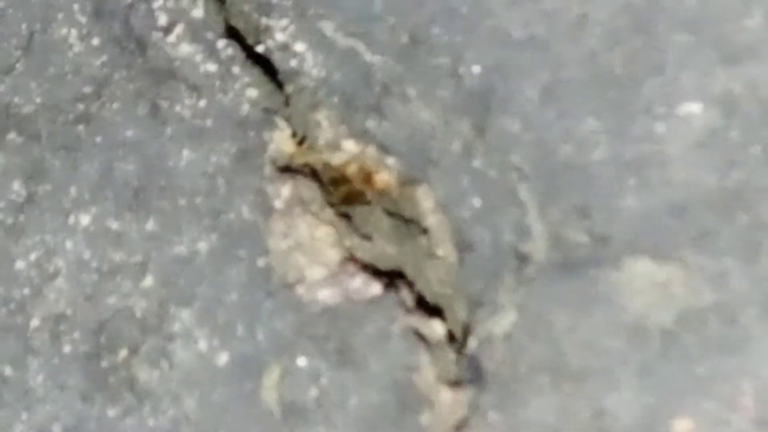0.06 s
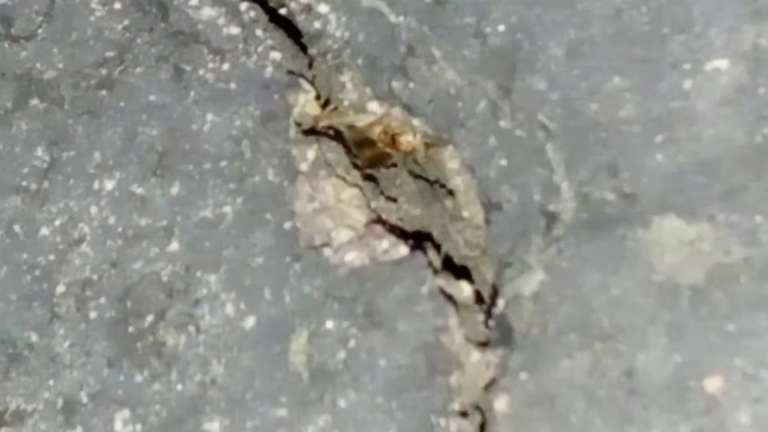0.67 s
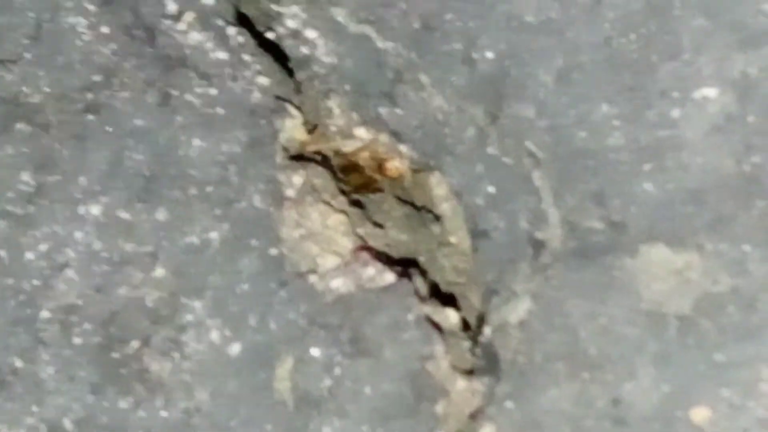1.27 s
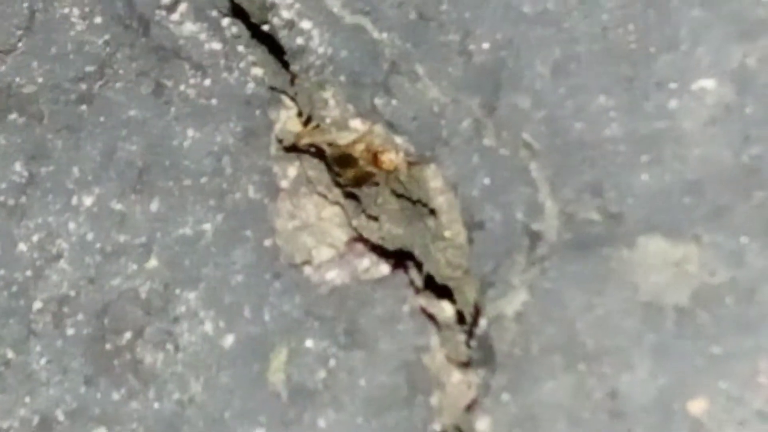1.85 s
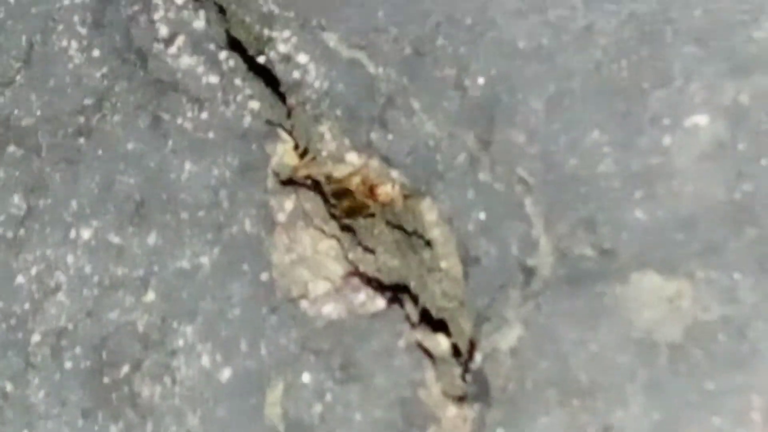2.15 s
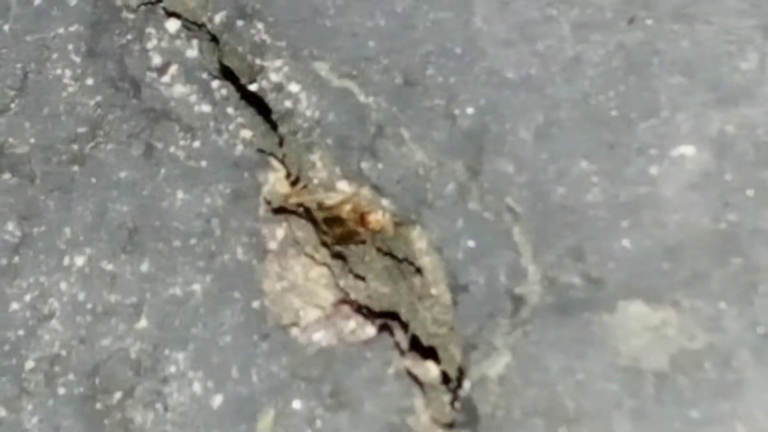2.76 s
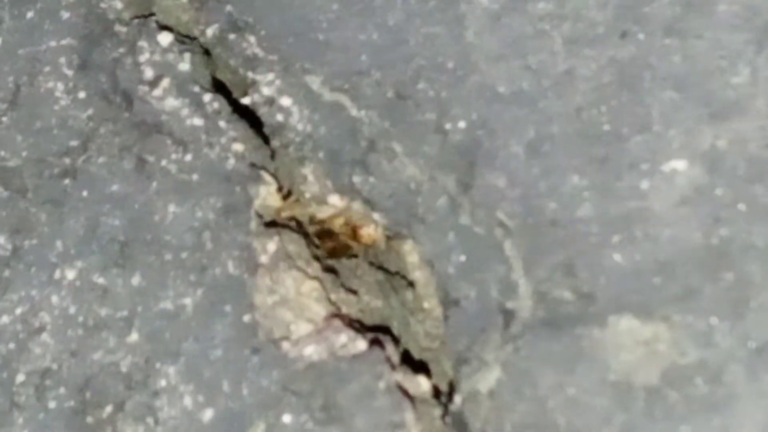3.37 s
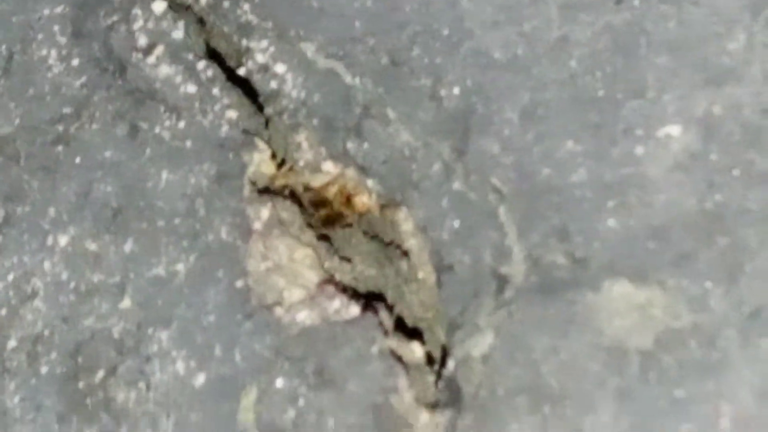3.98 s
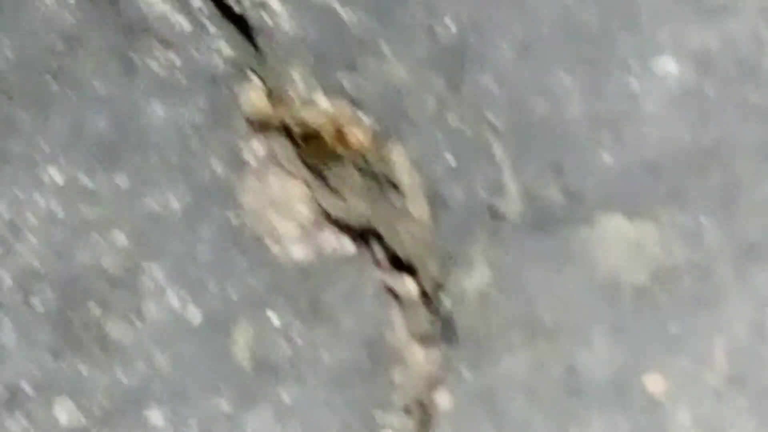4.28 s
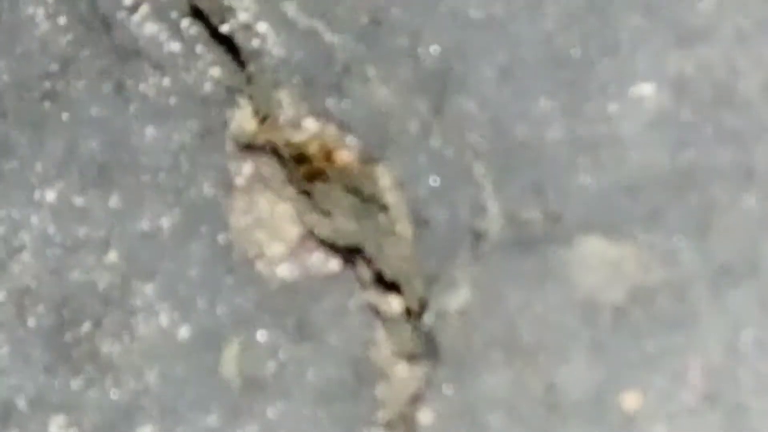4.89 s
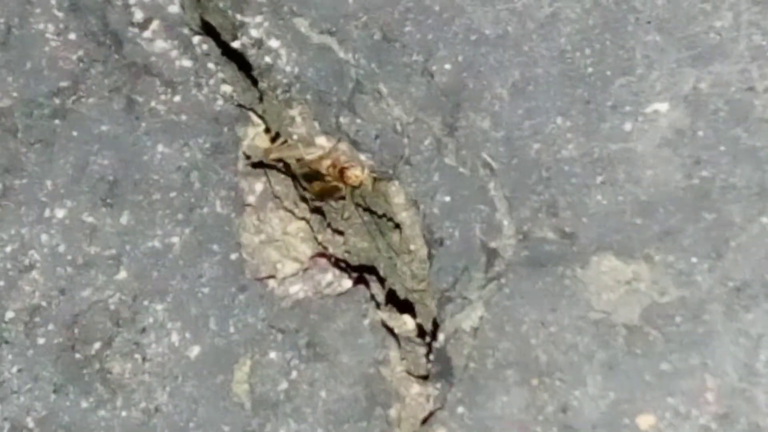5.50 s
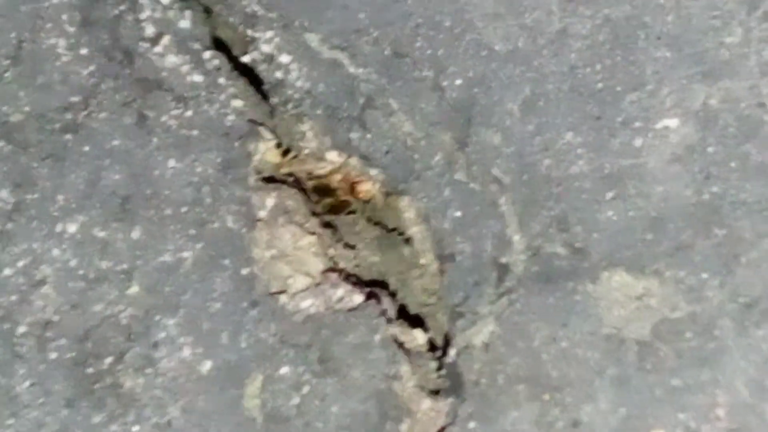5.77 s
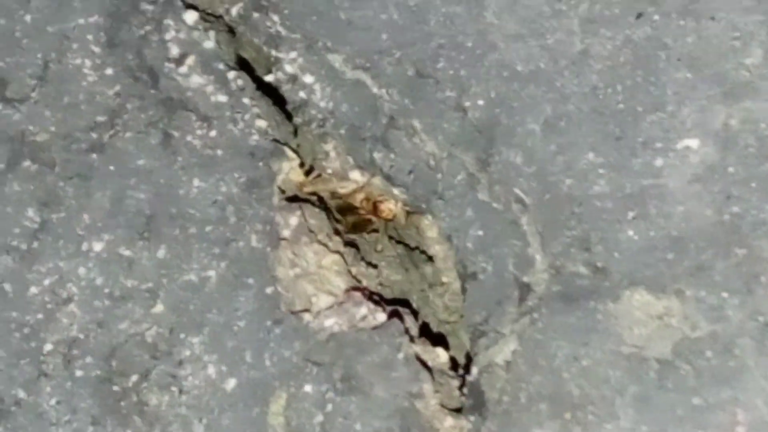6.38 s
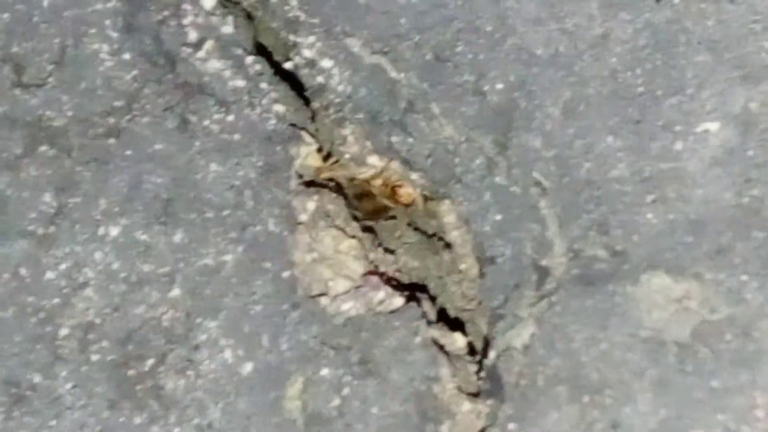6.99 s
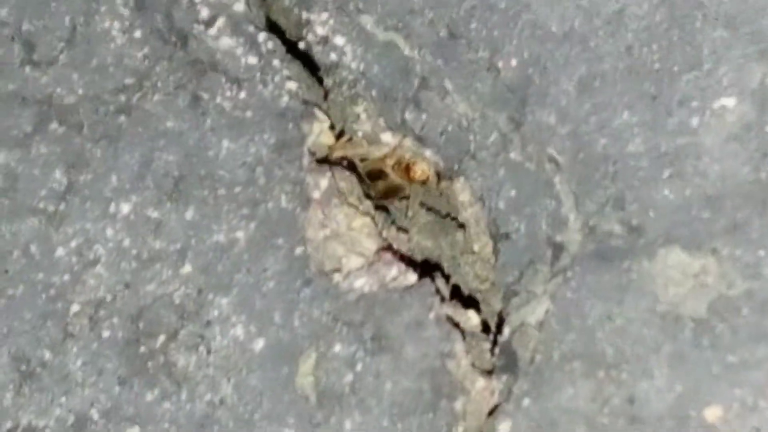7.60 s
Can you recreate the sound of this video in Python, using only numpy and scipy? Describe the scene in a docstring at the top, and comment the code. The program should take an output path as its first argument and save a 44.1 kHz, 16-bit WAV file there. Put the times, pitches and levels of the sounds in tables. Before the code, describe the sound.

Fast, regular, high-pitched cricket chirping close by, with faint traffic rumble and a few tiny bird calls behind it.

```python
"""A cricket is already singing from a crack in sunlit concrete, close to the microphone: eight chirps a
second, three strokes each, its scraper running along the file and ringing the wings near 7 kHz. Gain
control ducks under each chirp; a distant engine drones over outdoor rumble. Half a second in come the
first of a few sharp snaps, small bird calls and soft rustles. At 1.5 s one chirp is hurried. From about
3 s far-off noise swells more strongly, and toward the end the traffic grows a little louder."""
import sys
import numpy as np
from scipy import signal
from scipy.fft import rfft, irfft
from scipy.io import wavfile
from scipy.ndimage import uniform_filter1d

SR = 44100
rng = np.random.default_rng(int(sys.argv[2]) if len(sys.argv) > 2 else 0)


def transcribe(signal):
    """Save signal, clipped to [-1, 1], as a 16-bit WAV file at the path in sys.argv[1]."""
    frames = np.atleast_2d(signal).T
    limited = np.clip(frames, -1, 1)
    pcm = np.round(limited * 32767).astype(np.int16)
    wavfile.write(sys.argv[1], SR, pcm)


N = 337365

# The cricket's chirps, close to the microphone. Each entry: centre of the last stroke in seconds.
CHIRP_TIMES = [0.0552, 0.1801, 0.3025, 0.4268, 0.5486, 0.6719, 0.7944, 0.9184, 1.0397, 1.1559, 1.2774,
               1.4012, 1.5053, 1.6269, 1.7464, 1.872, 2.0002, 2.1244, 2.2478, 2.3682, 2.4928, 2.615, 2.7326,
               2.8522, 2.9739, 3.0898, 3.2093, 3.3329, 3.4553, 3.5719, 3.697, 3.82, 3.944, 4.0652, 4.1935,
               4.3185, 4.4402, 4.5608, 4.6756, 4.7988, 4.9251, 5.0751, 5.2096, 5.3508, 5.4777, 5.6046,
               5.729, 5.8479, 5.9748, 6.1014, 6.2252, 6.345, 6.4717, 6.5977, 6.7205, 6.8465, 6.9699, 7.0925,
               7.2072, 7.3233, 7.4448, 7.565, 7.688]
# The three strokes of a chirp. Each row: offset from the last in seconds, length in seconds, level in
# dB, top pitch in Hz, seconds from centre to top pitch, octave against the tone in dB, scrape in dB.
STROKES = [(-.0399, 0.0075, -20.8, 7080, -0.0022, -24.5, -51.5),
           (-.0214, .011, -7.7, 7334, -.0014, -26.5, -46), (0, .012, -3.5, 7489, -0.0014, -33, -41)]
# The scraper slips on the file or misses it. Each row: time in seconds, loss of tone in dB.
SCRAPER_SLIPS = [(0.158, 4.5), (0.651, 8), (0.755, 8.5), (1.238, 8), (1.627, 2), (2.831, 6), (5.329, 8),
                 (6.598, 1), (7.072, 4.5), (7.093, 4.5), (7.207, 4), (7.302, 7), (7.424, 11), (7.445, .5),
                 (7.565, 3.5)]
# Brightness of the song. Each row: time in seconds, gain of the octave in dB.
OCTAVE_GAIN = [(0, 1.5), (6.7, -2), (7.1, 1)]
# Resonance of the scraped wings. Each row: frequency in Hz, relative level in dB.
WING_COLOUR = [(4500, -57), (5400, -25.5), (6200, -6), (7100, 1.5), (8000, -0.5), (9300, -9),
               (10500, -15.5), (12000, -20), (13200, -25), (14500, -17.5), (15500, -12), (16200, -23.5)]


def cricket(shimmer=.0075, skip_depth=.12, slip_scrape_db=-39, slip_drop_hz=170, slip_fall_hz_per_s=70000):
    """The scraper runs along the file: a gliding tone, rough where teeth are skipped, over a scrape."""
    tone, scrape = np.zeros(N), np.zeros(N)
    t = np.arange(-800, 1600) / SR  # seconds from the centre of a stroke
    for chirp in CHIRP_TIMES:
        hurried = abs(chirp - 1.505) < .05  # this chirp starts late and drops its middle stroke
        delay_s = .023 * hurried
        add(tone, chirp - .0545 + delay_s, wing_opening())
        for stroke, (offset, length, db, hz, fastest_s, octave_db, scrape_db) in enumerate(STROKES):
            if hurried and stroke == 1:
                continue
            centre = chirp + offset + (stroke == 0) * delay_s
            start = centre + t[0]
            force, speed, grit, snag = rng.standard_normal(4)  # no two strokes are alike
            # a slip cuts the stroke short, lowers it, steepens its fall and turns it into a rasp
            loss_db = sum(loss for when, loss in SCRAPER_SLIPS if abs(when - centre) < .008)
            slip = 1 - np.exp(-loss_db / 2)
            grip_s = length * (1 - .42 * slip)
            db += .55 * force - loss_db
            hz += 20 * speed - slip * (slip_drop_hz + slip_fall_hz_per_s * np.clip(t, -grip_s, grip_s))
            scrape_db = slip * slip_scrape_db + (1 - slip) * (scrape_db + 2 * grit)
            # teeth are skipped as the last stroke slows, and all through one that grips badly
            slowing = (stroke == 2) * np.exp(-((t / grip_s - .28) / .17) ** 2)
            bad_grip = min(undb(scrape_db - db + 29) ** 2, 2)
            rough = shimmer + skip_depth * (slowing + .5 * bad_grip)
            octave_db += np.interp(centre, *np.transpose(OCTAVE_GAIN))
            ring, envelope = wing_stroke(t, grip_s, hz, fastest_s, octave_db, rough)
            add(tone, start, undb(db) * ring)
            # the scraper catches with a click, skids if it grips badly, then rubs along the file
            catch = undb(5 + 4 * snag) * burst(t + .49 * length)
            skid = slip * undb(9) * np.exp(-((t + grip_s / 2) / .0014) ** 2)
            rub = undb(-1) * envelope + undb(8) * (1 - slip) * slowing
            add(scrape, start, undb(scrape_db) * (catch + skid + rub))
            clicks, pings = wing_ticks(t, stroke)
            add(scrape, start, clicks)
            add(tone, start, pings)
    teeth = unit(rng.standard_normal(N) * undb(5.5 * rng.standard_normal(N)))
    # wings this small radiate almost nothing below their resonance
    small_wings = signal.butter(8, 5600, "high", fs=SR, output="sos")
    return signal.sosfiltfilt(small_wings, tone + colour(teeth * scrape, WING_COLOUR))


def wing_stroke(t, length, top_hz, fastest_s, octave_db, rough, sag_hz_per_s2=16.1e6, wander_hz=18):
    """One stroke's tone and envelope: it swells and fades as the wings close, arching with their speed."""
    travel = np.clip(t / length, -.5, .5)
    envelope = np.maximum(np.cos(np.pi * travel), 0)
    pitch = top_hz - sag_hz_per_s2 * (travel * length - fastest_s) ** 2 + wander_hz * walk(424, len(t))
    phase = phase_of(pitch) + rough * walk(1500, len(t))
    # the tooth strikes, and with them the octave, are hardest early in the stroke
    octave = envelope ** .58 * undb(octave_db - 19 * travel + 3 * walk(500, len(t)))
    ring = envelope * np.sin(phase) + octave * np.sin(2 * phase)
    return (1 + rough * walk(1300, len(t))) * ring, envelope


# Ticks of the reopening wings. Each row: stroke (0-2), seconds from its centre, level in dB, ring in Hz.
WING_TICKS = [(0, -.0153, -42.5, 6540), (0, -.0105, -48.5, 6300), (0, .003, -46, 6500),
              (0, .0065, -43, 6800), (0, .0092, -40.5, 6500), (1, .0045, -39, 6600), (1, .008, -44, 6800),
              (1, .0105, -46, 8460), (1, .0132, -39, 6900), (2, .0065, -39, 6500), (2, .0118, -37, 6600),
              (2, .016, -46, 6700)]


def wing_ticks(t, stroke, click_db=-5):
    """The wings tick as they reopen: the envelope of the noisy clicks, and the pings they ring with."""
    clicks, pings = np.zeros(len(t)), np.zeros(len(t))
    for owner, delay_s, db, ring_hz in WING_TICKS:
        if round(owner) == stroke:
            late, loud, sharp = rng.standard_normal(3)
            since = t - delay_s - .0004 * late
            tick = undb(db + 3 * loud) * burst(since)
            clicks += undb(click_db) * tick
            pings += tick * np.sin(2 * np.pi * (ring_hz + 140 * sharp) * since)
    return clicks, pings


def wing_opening(length_s=.0086, db=-41, from_hz=9200, to_hz=6200):
    """Before each chirp the wings open, brushing the file backwards in a faint falling zip."""
    travel = np.linspace(0, 1, int(length_s * SR))
    pitch = to_hz + (from_hz - to_hz) * (1 - travel) ** 1.2 + 250 * walk(1200, len(travel))
    envelope = undb(db + 3 * walk(700, len(travel))) * np.sin(np.pi * travel)
    return envelope * np.sin(phase_of(pitch))


# Snaps at the cricket's crack. Each row: time in seconds, level in dB.
SNAP_HITS = [(.426, -21), (1.75, -22), (6.23, -22), (7.093, -22)]
# Colour of a wing snap. Each row: frequency in Hz, relative level in dB.
SNAP_COLOUR = [(1500, -40), (4200, -8.5), (7500, 5), (10000, -6), (15500, -15)]


def wing_snaps():
    """Now and then a sharp little snap, one bright impulse, breaks through the song."""
    clicks = np.zeros(N)
    for s, db in SNAP_HITS:
        add(clicks, s, undb([db]))
    return colour(clicks, SNAP_COLOUR)


# A small bird somewhere behind the cricket.
# Each row: start in seconds, length in seconds, level in dB, starting pitch in Hz, lowest pitch in Hz.
BIRD_NOTES = [(.497, .029, -54, 5560, 5160), (.818, .026, -65, 5230, 5180), (2.602, .024, -57, 5680, 5200),
              (2.672, .044, -44, 5920, 5130), (4.832, .048, -44, 5880, 5110),
              (5.118, .024, -63, 5290, 5180), (7.116, .04, -48, 6100, 5170)]


def bird(echo_s=.12, waver_hz=40, flutter_db=2, turn=.78):
    """Short whistles that swoop down and just turn up again, each thrown back, blurred, by a far wall."""
    direct, echo = np.zeros(N), np.zeros(N)
    for start, length, db, from_hz, low_hz in BIRD_NOTES:
        progress = np.linspace(0, 1, int(length * SR))
        swoop = low_hz + (from_hz - low_hz) * (1 - progress / turn) ** 2
        phase = phase_of(swoop + waver_hz * walk(400, len(progress)))
        envelope = np.abs(np.sin(np.pi * progress)) ** .6 * undb(flutter_db * walk(200, len(progress)))
        call = undb(db) * envelope * (np.sin(phase) + undb(-28) * np.sin(2 * phase))
        add(direct, start, call)
        add(echo, start + echo_s, call)
    return direct + reflections(direct, db=-10, t60_s=.2) + reflections(echo, db=-15, t60_s=.06)


# The exhaust of an engine far from the microphone. Each row: harmonic number, mean level in dB.
EXHAUST_HARMONICS = [(1, -40.5), (2, -34), (3, -38), (4, -41.5), (5, -46), (6, -57.5), (7, -56.5), (8, -65)]
# Its harmonics fade on the way here; only the swing about each column's mean counts.
# Each row: time in seconds, then in dB the second, the third, and the fourth and fifth together.
LOW_FADES = [(0, -36, -42, -46), (0.5, -35.5, -40.5, -43.8), (1.0, -35.5, -45.5, -48),
             (1.6, -38.5, -40.5, -41.5), (2.2, -35.5, -40.0, -43.5), (2.55, -35, -39, -40.5),
             (2.9, -34.0, -37.5, -37), (3.35, -35.5, -40, -44), (3.75, -36, -36.5, -42.5),
             (4.1, -34.5, -39, -45), (4.4, -33.0, -41, -43.5), (5.2, -34.0, -37, -42), (5.6, -32, -34, -41),
             (6.1, -34, -35.5, -39), (6.7, -32, -36.5, -42), (7.15, -34, -35.0, -38.5),
             (7.6, -34, -35.5, -43.5)]
# The sixth and seventh come and go more deeply. Each row: time in seconds, relative level in dB.
SIXTH_FADES = [(0, -66), (.5, -60), (1, -70), (1.3, -56), (1.65, -50), (2, -57), (2.42, -69), (2.68, -49),
               (3.35, -57), (3.6, -49.5), (4.12, -59), (4.9, -54.5), (5.15, -70), (5.95, -52.5), (6.7, -62),
               (7.1, -49), (7.6, -58)]
SEVENTH_FADES = [(0, -72), (.45, -59), (1.55, -62), (1.92, -55), (2.17, -62), (2.52, -53), (2.8, -63),
                 (3.25, -52), (3.75, -64), (4.05, -52), (4.95, -52), (5.3, -63), (5.65, -54), (6.4, -51),
                 (6.75, -57), (7.2, -53), (7.6, -62)]
# Faint hums and whines beside the drone. Each row: pitch in Hz, level in dB.
ENGINE_WHINES = [(123, -58), (312, -57), (438, -61), (1254, -63), (1619, -68), (3957, -70.5)]


def engine(firing_hz=85.25, slowing_hz_per_s=.33, lag_s=.009, lag_hz=400):
    """Firing pulses of a far, slowing engine; the lows arrive last and the air makes harmonics waver."""
    hz = firing_hz - slowing_hz_per_s * np.arange(N) / SR
    levels = curves(LOW_FADES) + curves(SIXTH_FADES) + curves(SEVENTH_FADES)
    second, third, middle, sixth, seventh = (level - level.mean() for level in levels)
    fades = [0, second, third, middle, middle, sixth, seventh, 3 * walk(3)]
    phase = phase_of(hz)
    drone = np.zeros(N)
    for (k, db), fade_db in zip(EXHAUST_HARMONICS, fades):
        lag_cycles = lag_s * lag_hz * (1 - np.exp(-k * hz.mean() / lag_hz))
        drone += undb(db + fade_db + k / 8 * walk(12)) * np.sin(2 * np.pi * lag_cycles - k * phase)
    for whine_hz, db in ENGINE_WHINES:
        drone += undb(db + 2.1 * walk(4)) * np.sin(phase_of(whine_hz + 2.39 * walk(9)))
    return np.sqrt(2) * drone


# Soft rustles near the microphone, and at 4.23 s one brief dull snap. # Each row: centre in seconds, half
# length in seconds, level in dB, pitch of the knock in Hz.
NEAR_RUSTLES = [(0.618, 0.037, -52.5, 690), (4.0, 0.028, -54, 1850), (4.231, .001, -48, 3500),
                (5.575, 0.019, -47, 465), (5.624, 0.038, -47, 1300)]
# Colour of their hiss. Each row: frequency in Hz, relative level in dB.
RUSTLE_COLOUR = [(300, -23), (700, -5), (2300, -2.5), (3100, -20), (4000, -7), (5000, -17.5), (12000, -29)]


def rustles(knock_db=-2):
    """Brief soft puffs of hiss, each with a dull resonance in it; the shortest is a dull snap."""
    t = np.arange(N) / SR
    hiss = colour(rng.standard_normal(N), RUSTLE_COLOUR)
    out = np.zeros(N)
    for s, half_s, db, hz in NEAR_RUSTLES:
        knock = walk(.2 * hz) * np.sin(2 * np.pi * hz * t)
        out += undb(db) * np.exp(-((t - s) / half_s) ** 2) * (hiss + undb(knock_db) * knock)
    return out


# Soft swells of noise, far off.
# Each row: centre in seconds, half length in seconds, level in dB, band centre in Hz, width in Hz.
FAR_SWELLS = [(3.089, 0.27, -52.5, 1722, 520), (3.3, .15, -53.5, 1130, 352), (5.104, 0.18, -47.5, 940, 260),
              (6.055, 0.22, -49.5, 1100, 319.9), (7.119, 0.43, -50, 1100, 280), (.65, .15, -56, 1500, 450),
              (2.0, .2, -57, 1600, 450), (5.5, .2, -52.5, 1100, 250), (5.1, 1, -66, 3900, 260),
              (6.4, .22, -60, 2330, 90)]


def swells(flutter_db=1.2):
    """Far-off noise that rises and sinks, each time around a pitch of its own."""
    t = np.arange(N) / SR
    f = np.fft.rfftfreq(N, 1 / SR)
    out = np.zeros(N)
    for s, half_s, db, hz, width_hz in FAR_SWELLS:
        roar = shaped_noise(1 / (1 + ((f - hz) / width_hz) ** 2) ** 2)
        out += undb(db + flutter_db * walk(25)) * np.exp(-((t - s) / half_s) ** 2) * roar
    return out


# The open air all around the microphone. Each row: frequency in Hz, relative density in dB.
AIR_COLOUR = [(25, -23.5), (55, -13.5), (85, -3), (130, -0.5), (300, -5), (450, -11), (700, -14.5),
              (1150, -16), (1700, -22.5), (2300, -23), (3050, -39.5), (3900, -24), (4900, -45),
              (5800, -46.5), (7200, -28.3), (8300, -37), (9700, -36), (11500, -50.5), (15600, -57)]
# Traffic in the distance. Each row: time in seconds, relative level in dB.
TRAFFIC_LEVEL = [(0, -57), (2.3, -56), (5, -53.5), (7.6, -53)]


def outdoor_air(air_db=-42.5, flicker_db=2, drift_db=1.07):
    """Rumble and hiss in half-octave bands that flicker apart; those near 1 kHz rise with the traffic."""
    f = np.fft.rfftfreq(N, 1 / SR)
    spectrum = rfft(shaped_noise(gains(f, AIR_COLOUR)))
    traffic_db, = curves(TRAFFIC_LEVEL)
    octaves = np.clip(np.log2((f + 1) / 1000), -2.5, 3)  # from 1 kHz
    out = np.zeros(N)
    for centre in np.arange(-2.5, 3.1, .5):
        band = irfft(spectrum * np.maximum(1 - 2 * abs(octaves - centre), 0), N)
        rise_db = np.exp(-(centre + .18) ** 2) * (traffic_db - traffic_db.mean())
        restless = np.clip(1 + centre / 3, 0, 1)  # the low bands are steadier
        out += undb(rise_db + restless * (flicker_db * walk(16) + drift_db * walk(2.75))) * band
    return undb(air_db) * out


def reflections(x, db, t60_s):
    """Scattered reflections from the ground and walls."""
    t = np.arange(SR // 2) / SR
    tail = rng.standard_normal(len(t)) * np.exp(-np.log(1000) * t / t60_s) * (1 - np.exp(-t / .004))
    return undb(db) * signal.fftconvolve(x, tail / np.linalg.norm(tail))[:N]


def undb(db):
    return 10 ** (np.asarray(db) / 20)


def unit(x):
    return x / np.sqrt(np.mean(x ** 2))


def phase_of(hz):
    return 2 * np.pi * np.cumsum(hz) / SR


def curves(table):
    """The columns of a table joined by straight lines in time."""
    s, *columns = np.transpose(table)
    return [np.interp(np.arange(N) / SR, s, c) for c in columns]


def add(out, s, sound):
    """Mix a sound in at time s."""
    i = int(round(s * SR))
    a, b = max(i, 0), min(i + len(sound), N)
    if b > a:
        out[a:b] += sound[a - i:b - i]


def gains(f, points):
    """Gain at frequencies f along a (Hz, dB) curve."""
    hz, db = np.transpose(points)
    return undb(np.interp(np.log(f + 1), np.log(hz), db))


def shaped_noise(gain):
    """Noise of unit power with the given spectrum."""
    return unit(irfft(rfft(rng.standard_normal(N)) * gain, N))


def colour(x, points, size=1024):
    """Causal filter of unit power with a (Hz, dB) response."""
    cepstrum = irfft(np.log(gains(np.fft.rfftfreq(size, 1 / SR), points)))
    cepstrum[1:size // 2] *= 2
    cepstrum[size // 2 + 1:] = 0
    response = irfft(np.exp(rfft(cepstrum)))
    return signal.fftconvolve(x, response / np.linalg.norm(response))[:N]


def walk(rate, size=N):
    """Smooth chance with a spread of 1, changing about rate times a second."""
    k = max(int(SR / rate), 1)
    held = np.repeat(rng.standard_normal(size // k + 3), k)
    return unit(uniform_filter1d(uniform_filter1d(held, k), k))[k:k + size]


def burst(t, decay_s=.0023, attack_s=.00026):
    """A quick start at t = 0 that dies away."""
    return np.clip(t / attack_s, 0, 1) * np.exp(-np.maximum(t - attack_s, 0) / decay_s)


def scene():
    """One microphone by the crack: the cricket up close, the rest of the outdoors behind it."""
    song = cricket() + wing_snaps()
    crack = reflections(song, db=-34, t60_s=.015)
    walls = reflections(song, db=-50, t60_s=.16)
    return (song + crack + walls + bird() + engine() + outdoor_air() + swells() + rustles())[None]


def record(dry, threshold_db=-16.5, bass_share=.27, split_hz=600, top_hz=16000):
    """Two-band gain control ducks under each chirp, the treble more than the bass; then the top is cut."""
    bass = signal.sosfiltfilt(signal.butter(4, split_hz, fs=SR, output="sos"), dry)
    treble = dry - bass
    power = uniform_filter1d(uniform_filter1d(treble ** 2, size=1323), size=529)  # over 30 and 12 ms
    late_power = np.pad(power, ((0, 0), (397, 0)))[:, :N]  # 9 ms behind
    gain = (1 + np.maximum(late_power, 0) / undb(threshold_db) ** 2) ** -.5
    top_cut = signal.ellip(8, .2, 60, top_hz, fs=SR, output="sos")
    return signal.sosfilt(top_cut, treble * gain + bass * gain ** bass_share)


dry = scene()
out = record(dry)
transcribe(out)
```